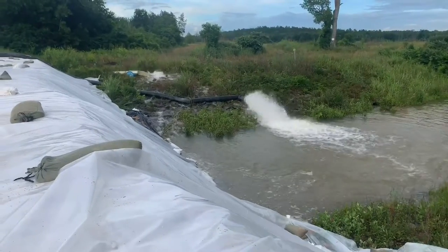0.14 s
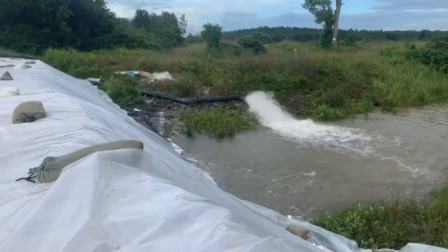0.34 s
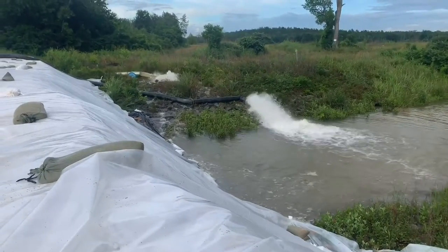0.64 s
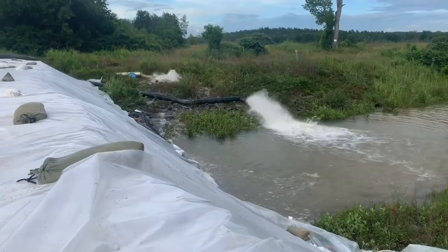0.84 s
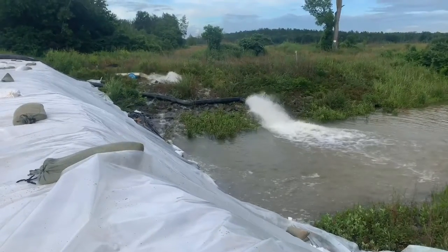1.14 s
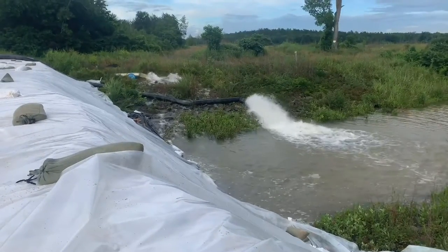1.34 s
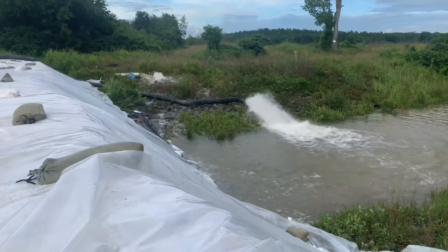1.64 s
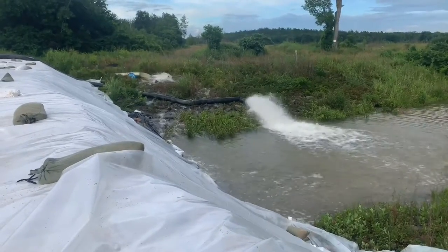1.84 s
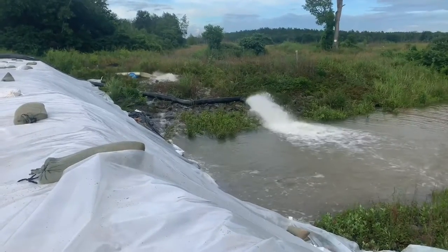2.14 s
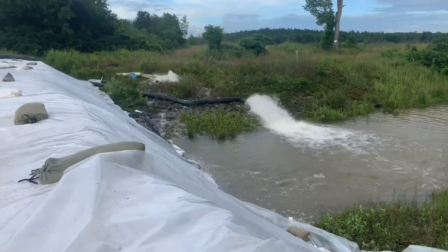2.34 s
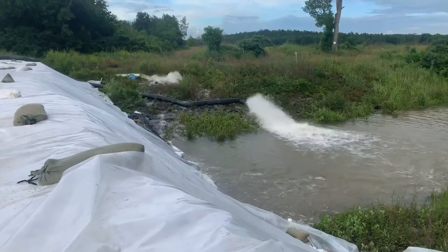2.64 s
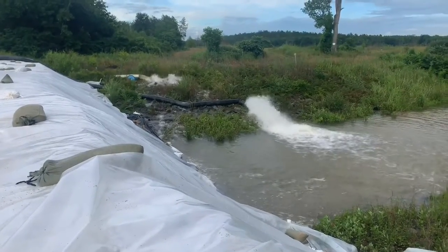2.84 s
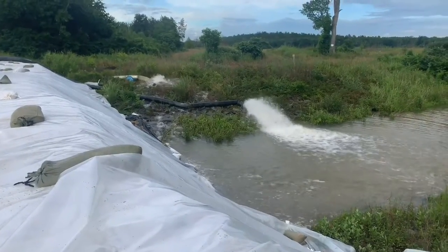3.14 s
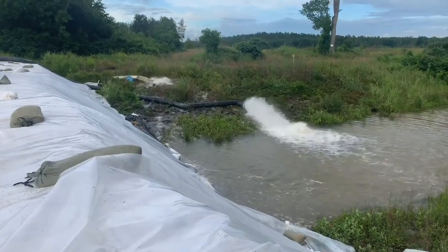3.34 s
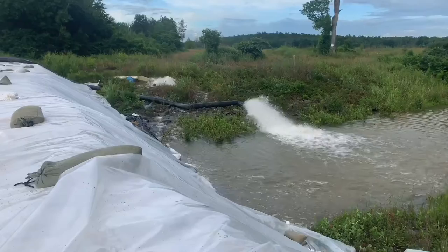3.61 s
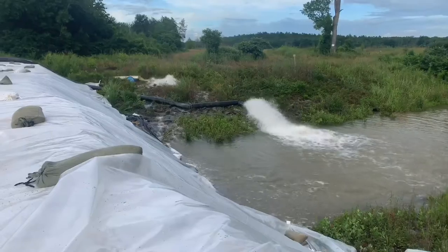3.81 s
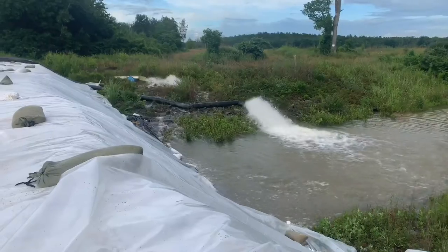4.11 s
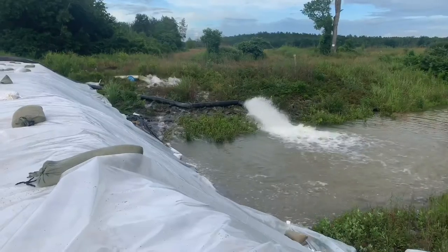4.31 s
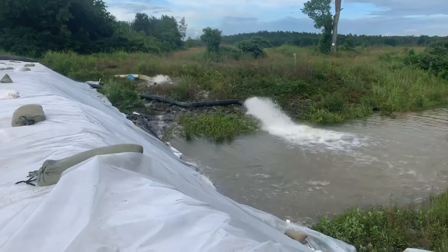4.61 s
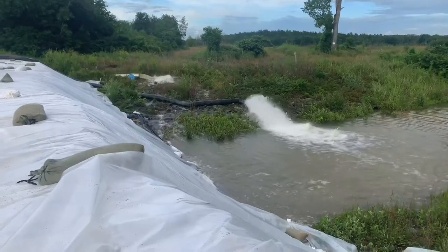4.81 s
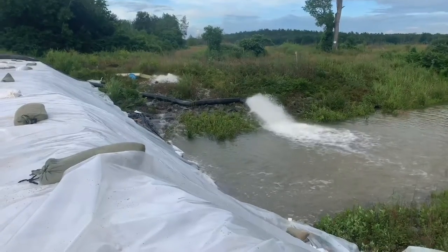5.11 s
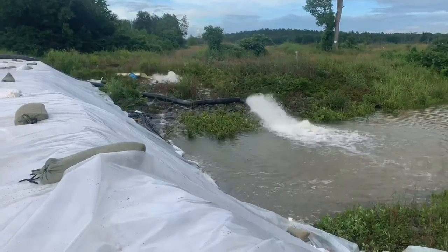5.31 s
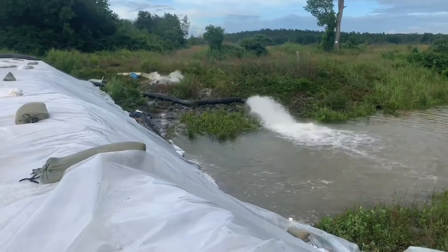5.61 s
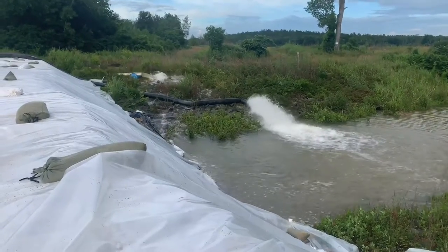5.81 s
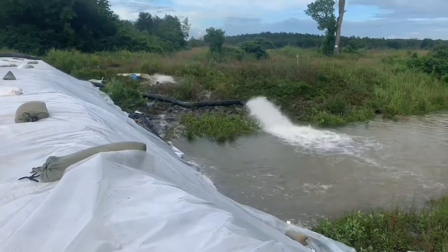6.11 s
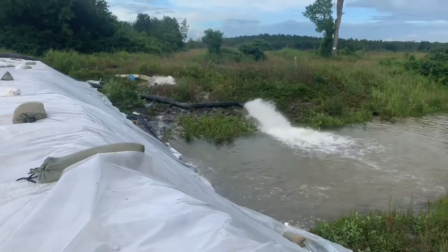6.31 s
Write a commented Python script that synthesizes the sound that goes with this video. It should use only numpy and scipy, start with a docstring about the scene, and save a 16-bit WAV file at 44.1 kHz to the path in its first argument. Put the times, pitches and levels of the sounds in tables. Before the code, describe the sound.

From 0 to about 6.5 seconds the sound is continuous, with no start or stop. Two six-cylinder diesel pumps hold a low buzzing drone near 90 hertz, at slightly different speeds, so it throbs about three times a second; one drifts slightly in speed. A rough low boom leans left, and dense metallic clatter rings through the middle range. Thin turbo whistles sit very high; the lower swells most around 2.5, 3.6 and 4.4-5.4 seconds. A water jet plunges into the creek with a broad bubbling rush and bright fizzing spray. Short slaps of spray flare irregularly, notably near 1.1, 2.4, 3.1, 4.6 and 6.1 seconds, and the flow is fuller around 4.8-5.2. A tiny high hiss flicks by at 2.4. After 5 seconds the clatter's tone shifts subtly as the phone moves. Open air, short engine reflections, wide stereo, crisp top end.

```python
"""Two diesel pumps and a jet of water

Two six-cylinder pumps run off to the left at nearly the same speed; their exhaust tones beat about three times a second.
Filtered noise makes their boom and panel clatter, and two thin turbocharger whistles lie on top.
Ahead on the right a hose throws water into a creek: random impacts make a rush with surging, fizzing spray.
It is open air, with only short reflections around the engines; a phone on the dyke hears it through two ports."""
import sys
import numpy as np
from scipy import signal
from scipy.fft import rfft, irfft
from scipy.io import wavfile
from scipy.ndimage import uniform_filter1d

SR = 44100
rng = np.random.default_rng(int(sys.argv[2]) if len(sys.argv) > 2 else 0)


def output_pcm(signal):
    """Save a mono or channel-first signal as 16-bit PCM at the path in sys.argv[1].

    Samples are clipped to [-1, 1] before scaling.
    """
    pcm = np.clip(np.atleast_2d(signal).T, -1, 1) * 32767
    wavfile.write(sys.argv[1], SR, np.round(pcm).astype(np.int16))


N = 284886
# time in seconds; frequency in Hz, kept just above zero so it can be divided by
TIME, FREQ = np.arange(N) / SR, np.fft.rfftfreq(N, 1 / SR) + 1e-6

# Exhaust tones of each pump; multiple 3 is the firing rate.
# Each row: multiple of crank speed, level in dB.
EXHAUST_A = [(2.0, -54), (2.5, -60), (3.0, -30.5), (3.5, -62), (4.0, -50.5), (4.5, -51.5), (5.5, -55),
             (6.0, -48.5), (7.0, -52.5), (7.5, -53.5), (8.0, -53), (9.0, -58), (10.0, -53.5), (11.0, -58.5),
             (16.5, -60)]
EXHAUST_B = [(1.0, -56), (2.0, -51), (3.0, -33.3), (3.5, -56), (4.0, -44), (4.5, -40), (5.0, -45.5),
             (5.5, -50), (6.0, -48.5), (6.5, -49.5), (7.0, -45), (7.5, -55.5), (8.0, -47), (8.5, -54),
             (9.0, -42), (9.5, -55.5), (10.0, -52), (10.5, -54), (11.0, -58), (16.0, -56)]
# Hums of other machinery by the pumps. Each row: pitch in Hz, level in dB.
HUMS = [(45.7, -50), (60.0, -53), (87.6, -59), (135.0, -46.5), (215.6, -50.5), (431.5, -58.5)]
# Tone colour of uneven combustion booming in silencers and housings.
# Each row: frequency in Hz, relative level in dB per Hz.
BOOM_COLOUR = [(20, -22), (45, -9.5), (72, -10.5), (105, -0.5), (135, -5.5), (170, -2), (215, -1.5),
               (255, -2.5), (285, -4), (330, -8.5), (420, -8), (480, -9.5), (540, -6), (620, -11),
               (760, -10.5), (1100, -50.5)]
# Ringing engine panels. Each row: pitch in Hz, width in Hz, relative level in dB, left minus right in dB,
# delay at the right port in ms, change in dB once the phone has moved.
PANELS = [(535, 91, -2.5, 12, 0.56, 1.5), (804, 240, -2.5, 2.5, 0.35, -0.5), (926, 120, 0, -3.5, 0.45, 0.5),
          (1200, 360, 1.5, 0, 0.48, 1.5), (1524, 153, 3, -2, 0.39, 1.5), (1692, 170, 3.5, -3, 0.41, 2.5),
          (2140, 170, 2.5, -3, 0.49, -7.5), (2374, 280, 1.5, -1.5, 0.48, -2.5),
          (2890, 300, -4, -1.5, 0.494, -1), (3570, 300, -7, -1.5, 0.48, 3),
          (4050, 170, -8.5, 3, 0.524, 2.5), (4526, 370, -4, 0, 0.49, -0.5),
          (5490, 940, -12.5, -3, 0.508, 1.5)]
# The phone shifts a little near the end. Each row: time in seconds, share of the move from 0 to 1.
PHONE_MOVE = [(0, 0.1), (4.3, 0.07), (5.3, 0.37), (6.05, 0.86), (6.46, 1)]
# Swell of the lower turbocharger whistle. Each row: time in seconds, change in dB.
TURBO_SWELL = [(0, -3), (1.4, -6), (2.3, -3.5), (2.55, 2), (2.9, 0), (3.1, -3), (3.58, 2.7), (3.8, -3),
               (4.35, 2), (4.52, -1), (4.7, 5.5), (4.95, 1.5), (5.2, 4), (5.42, 4), (5.9, -4), (6.3, 0)]
# Slow swell of the flow from the hose. Each row: time in seconds, change in dB.
FLOW = [(0, -3.5), (0.25, -1), (0.88, -2.1), (1.4, -1.9), (1.85, -3.3), (2.5, -0.2), (2.8, -2.5), (3.0, -2),
        (3.45, 0.5), (3.97, -3.9), (4.3, 0.6), (4.52, -4), (4.8, 1.2), (5.15, 2.3), (5.45, -1.4),
        (5.85, -2.6), (6.12, -1), (6.46, 1)]
# Slugs of water that slap down and throw extra spray.
# Each row: time of the peak in seconds, half length in seconds, extra level in dB over the flow.
SLUGS = [(.186, .021, 3.8), (.387, .033, 1.8), (.533, .018, 2.9), (.634, .02, 4.3), (1.102, .024, 7.2),
         (1.416, .04, 2.7), (2.083, .035, 4.1), (2.394, .039, 5), (2.65, .03, 4), (2.93, .03, 3.8),
         (3.085, .03, 5.3), (3.264, .025, 2.3), (3.393, .024, 4.4), (3.602, .013, 2), (3.736, .02, 3.6),
         (4.214, .016, 4.1), (4.623, .026, 5.3), (4.862, .015, 4), (5.23, .025, 3.3), (6.105, .04, 5.9),
         (6.345, .018, 5.6)]
# Tone colour of the jet plunging into the creek. Each row: frequency in Hz, relative level in dB per Hz.
PLUNGE_COLOUR = [(150, -5), (400, -8), (800, -1), (1300, -5), (2000, -7), (3200, -2.5), (4400, -3.5),
                 (6300, -7.5), (9000, -59), (16000, -57)]
# Tone colour of spray falling back on the water. Each row: frequency in Hz, relative level in dB per Hz.
SPRAY_COLOUR = [(2000, -16), (4500, -7), (6300, -5.8), (7300, -0.5), (8000, -1.2), (8550, 2), (9100, -1.5),
                (10100, 1), (10900, -1.5), (12300, -1.7), (14700, -3.5), (16000, -2)]
# A brief burst of narrow, high noise. One row: time of the peak in seconds, half length in seconds,
# centre in Hz, width in Hz, level in dB at the peak.
HIGH_BURST = (2.405, .013, 13250, 520, -51.5)
# The microphone ports ring in the top octave. Each row: frequency in Hz, boost in dB.
PORTS = [(12400, 0), (12750, 4), (13100, 13), (13500, 9), (13900, 9), (14300, 7), (14600, 1), (15200, 1),
         (15600, 0)]

# set speeds of the pumps, and the head start of the second crank
RPM_A, RPM_B, LEAD_B_TURNS = 1812.9, 1870.1, .071
# the governor of pump B hunts: HUNT_START_S is when it falls through the set speed;
# HUNT_RPM is the swing to either side at time zero
HUNT_PERIOD_S, HUNT_START_S, HUNT_RPM, HUNT_GROWTH_RPM_PER_S = 2.28, .15, 1.0, 1.3
# random level changes of the boom, the panels and the jet: size in dB, changes per second
BOOM_ROLL_DB, BOOM_ROLL_RATE = .55, 14
FLARE_DB, FLARE_RATE = 1.1, 14
CHURN_DB, CHURN_RATE = .8, 36
# how much later each source reaches the right port; below zero means earlier
PUMP_LAG_MS, JET_LAG_MS = .49, -.26
# turbocharger whistles: pitch in Hz, width in Hz, level in dB (before any swell)
TURBO_LOW, TURBO_HIGH = (11005, 18, -55.7), (15620, 150, -55.5)
# how much of the surge, in dB, the plunge and the lumps follow
HEAVY_SURGE_SHARE = .28
# lumps of water: how many, range of pitch, range of strength, level of them all before the surges
CLUMP_COUNT, CLUMP_LOW_HZ, CLUMP_HIGH_HZ, CLUMP_RANGE_DB, CLUMP_DB = 480, 1600, 6000, 5.5, -50.3
# one lump: time constants of its rise and decay, half width of its band
CLUMP_ATTACK_S, CLUMP_DECAY_S, CLUMP_OCTAVES = .002, .011, .11
# spray: share scattered by the ground, level before the surges
SPRAY_SCATTER_DB, SPRAY_DB = -15, -40.7
# the phone passes nothing much above this
TOP_HZ = 15750


def undb(db):
    """Turn decibels into gain."""
    return 10 ** (np.asarray(db) / 20)


def unit(x):
    """Scale a sound to an average (rms) strength of one."""
    return x / np.sqrt(np.mean(x ** 2))


def curve(rows):
    """Join rows of time and value by straight lines."""
    return np.interp(TIME, *np.transpose(rows))


def colour(points):
    """Turn rows of Hz and dB into a gain at every frequency."""
    hz, db = np.transpose(points)
    return undb(np.interp(np.log(FREQ), np.log(hz), db))


def resonance(hz, width_hz, db):
    """Gain of something that rings: a peak at one pitch with steep sides."""
    off_pitch = (FREQ ** 2 - hz ** 2) / (2 * FREQ * width_hz)
    return undb(db) / (1 + 2 * off_pitch ** 2)


def shaped(x, gain):
    """Filter a sound by a gain per frequency, then scale it to rms one."""
    return unit(irfft(rfft(x) * gain, N))


def walk(rate):
    """A smooth random drift of rms one, changing about rate times a second."""
    size = int(np.clip(SR / rate, 2, N))
    steps = np.repeat(rng.standard_normal(N // size + 2), size)
    smooth = uniform_filter1d(steps, size)
    start = rng.integers(size)
    return unit(smooth[start:][:N])


def arrive(x, lag_ms, pan_db):
    """The right port hears the sound lag_ms later than the left, and pan_db weaker."""
    right = irfft(rfft(x) * np.exp(-2j * np.pi * FREQ * lag_ms / 1000), N)
    return np.array([x * undb(pan_db / 2), right * undb(-pan_db / 2)])


def spread(three, lag_ms, pan_db, scatter_db):
    """The first row comes straight; ground and grass scatter the other two, one to each port."""
    straight = arrive(three[0], lag_ms, pan_db)
    return unit(straight + undb(scatter_db) * three[1:])


def drops(per_second, size_db):
    """Three streams of dense random impacts, a few larger than the rest."""
    hit = rng.random((3, N)) < per_second / SR
    size = undb(size_db * np.minimum(rng.exponential(size=(3, N)), 5))
    return hit * size * rng.standard_normal((3, N))


def cranks():
    """Crank angles in turns: pump A is steady, pump B swings slowly about its set speed."""
    swing_rpm = HUNT_RPM + HUNT_GROWTH_RPM_PER_S * TIME
    rpm_b = RPM_B - swing_rpm * np.sin(2 * np.pi * (TIME - HUNT_START_S) / HUNT_PERIOD_S)
    turns_a = RPM_A * TIME / 60
    turns_b = np.cumsum(rpm_b) / SR / 60 + LEAD_B_TURNS
    return turns_a, turns_b


def throb(turns):
    """Six cylinders give a narrow push three times a turn, averaging zero."""
    return sum(np.cos(6 * np.pi * k * turns) * (1 - k / 4) for k in (1, 2, 3))


def exhaust(turns, orders, waver):
    """The firing tone is firm; the tones from unequal cylinders waver."""
    out = 0
    for order, db in orders:
        angle = 2 * np.pi * order * turns
        offset = 2 * np.pi * rng.random()
        if order == 3:
            tone = np.cos(angle)
        else:
            tone = np.cos(angle + offset) * (1 + waver * walk(9))
        out = out + np.sqrt(2) * undb(db) * tone
    return out


def hums():
    """Other machinery by the pumps holds tones of fixed pitch whose strength wavers."""
    out = 0
    for hz, db in HUMS:
        tone = np.sin(2 * np.pi * (hz * TIME + rng.random()))
        out = out + np.sqrt(2) * undb(db) * tone * (1 + 0.16 * walk(3.1))
    return out


def boom():
    """Uneven combustion booms in silencers and housings: low noise that rolls in strength."""
    noise = shaped(rng.standard_normal(N), colour(BOOM_COLOUR))
    rolling = noise * undb(BOOM_ROLL_DB * walk(BOOM_ROLL_RATE))
    # it rolls over the dyke, so it comes from a little further ahead: half the delay
    return arrive(rolling, 0.5 * PUMP_LAG_MS, pan_db=4.5)


def knocking(turns):
    """Injectors and valves repeat a pattern every two turns, with loose rattle; both swell at each firing."""
    pattern = rng.standard_normal((3, 2900))
    place = (turns / 2 % 1 * pattern.shape[1]).astype(int)
    rattle = rng.standard_normal((3, N))
    return (.35 * pattern[:, place] + rattle) * (1 + .1 * throb(turns))


def clatter(turns_a, turns_b):
    """Knocking rings the panels, each placed and flaring on its own; reflections ripple the spectrum."""
    knocks = spread(knocking(turns_a) + knocking(turns_b), 0, pan_db=1.5, scatter_db=-10.0)
    sides = np.array([[.5], [-.5]])  # left, right
    powers = [resonance(hz, width, db + pan * sides) ** 2 for hz, width, db, pan, *_ in PANELS]
    delays_s = rng.uniform(.008, .04, size=5)
    echoes = 1 + 0.13 * sum(np.exp(-2j * np.pi * FREQ * delay) for delay in delays_s)
    # dividing by the root of the summed power keeps overlapping panels from piling up
    ringing = rfft(knocks) * echoes / np.sqrt(sum(powers))
    moved = curve(PHONE_MOVE)
    out = 0
    for power, (*_, lag_ms, moved_db) in zip(powers, PANELS):
        # half the delay goes to each port: left earlier, right later
        ports = np.exp(2j * np.pi * FREQ * sides * lag_ms / 1000)
        level_db = moved_db * moved + FLARE_DB * walk(FLARE_RATE)
        out = out + irfft(ringing * power * ports, N) * undb(level_db)
    return unit(out)


def pumps(turns_a, turns_b):
    """Exhaust tones and hums over a rough boom and the clatter of the engines."""
    notes = exhaust(turns_a, EXHAUST_A, waver=0.2) + exhaust(turns_b, EXHAUST_B, waver=0.2) + hums()
    engines = undb(-40.0) * boom() + undb(-38.0) * clatter(turns_a, turns_b)
    return arrive(notes, PUMP_LAG_MS, pan_db=1.0) + engines


def whistle(hz, wobble_hz):
    """A thin tone whose pitch trembles in the moving air, as heard along three paths."""
    pitch = hz + wobble_hz * np.array([walk(90) for _ in range(3)])
    tone = np.sin(2 * np.pi * np.cumsum(pitch, axis=1) / SR)
    return tone * undb(.8 * walk(12))


def turbos():
    """Turbochargers give a thin whistle that swells and fades, and a breathier one above it."""
    low_hz, low_width, low_db = TURBO_LOW
    high_hz, high_width, high_db = TURBO_HIGH
    low = spread(whistle(low_hz, low_width), 0, pan_db=-2, scatter_db=-2)
    breath = shaped(rng.standard_normal((3, N)), resonance(high_hz, high_width, 0))
    high = spread(breath, 0, pan_db=1, scatter_db=-14)
    return low * undb(low_db + curve(TURBO_SWELL)) + high * undb(high_db)


def surge():
    """How much spray the jet throws, in dB: slow flow, a short swell for each slug, and churning."""
    slugs = sum(db * np.exp(-.5 * ((TIME - at) / half) ** 2) for at, half, db in SLUGS)
    return curve(FLOW) + slugs + CHURN_DB * walk(CHURN_RATE)


def plunge():
    """Clouds of bubbles where the jet goes in; each octave of bubble sizes churns on its own."""
    bubbles = rfft(drops(per_second=6000, size_db=2.0)) * colour(PLUNGE_COLOUR)
    out = 0
    for octave in range(7, 15):  # centred on 2 to this power, in Hz; neighbours cross-fade
        share = np.maximum(1 - abs(np.log2(FREQ) - octave), 0)
        out = out + irfft(bubbles * share, N) * undb(.9 * walk(16))
    return spread(out, JET_LAG_MS, pan_db=7.0, scatter_db=6.0) * undb(-46.5)


def clumps():
    """Lumps of water break off the jet; each lands as a brief, dying burst of bubbles of its own size."""
    out, t = np.zeros((3, N)), TIME[:2048]
    envelope = (1 - np.exp(-t / CLUMP_ATTACK_S)) * np.exp(-t / CLUMP_DECAY_S)
    hz = np.fft.rfftfreq(len(t), 1 / SR) + 1  # plus one avoids the logarithm of zero
    for when, size, strength in rng.random((CLUMP_COUNT, 3)):
        centre_hz = CLUMP_LOW_HZ * (CLUMP_HIGH_HZ / CLUMP_LOW_HZ) ** size
        band = np.exp(-.5 * (np.log2(hz / centre_hz) / CLUMP_OCTAVES) ** 2)
        noise = rng.standard_normal((3, len(t)))
        burst = unit(irfft(rfft(noise) * band)) * envelope
        start = int(when * N)
        out[:, start:start + len(t)] += burst[:, :N - start] * undb(CLUMP_RANGE_DB * strength)
    return spread(out, JET_LAG_MS, pan_db=4.5, scatter_db=3) * undb(CLUMP_DB)


def spray(surge_db, pulse):
    """Fine drops fizz on the creek; the finest follow the surges most and throb with pump A."""
    impacts = shaped(drops(per_second=30000, size_db=.6), colour(SPRAY_COLOUR))
    rain = spread(impacts, JET_LAG_MS, pan_db=0, scatter_db=SPRAY_SCATTER_DB)
    # the finest drops are the part above about 12400 Hz
    fine = irfft(rfft(rain) / (1 + (12400 / FREQ) ** 24), N)
    coarse = (rain - fine) * undb(.48 * surge_db + .3 * walk(25)) * (1 + .04 * pulse)
    mist = fine * undb(surge_db + 1.05 * walk(45)) * (1 + .13 * pulse)
    return undb(SPRAY_DB) * (coarse + mist)


def high_noise_burst():
    """One brief burst of narrow noise near 13 kHz, equal in both ports."""
    at, half, hz, width_hz, db = HIGH_BURST
    band = shaped(rng.standard_normal(N), resonance(hz, width_hz, 0))
    return band * undb(db) * np.exp(-.5 * ((TIME - at) / half) ** 2)


def scene():
    """Crank angles drive the pumps; the surges drive the spray and stir the heavier water less."""
    turns_a, turns_b = cranks()
    surge_db = surge()
    machines = pumps(turns_a, turns_b) + turbos()
    heavy_water = (plunge() + clumps()) * undb(HEAVY_SURGE_SHARE * surge_db)
    return machines + heavy_water + spray(surge_db, throb(turns_a)) + high_noise_burst()


def record(dry):
    """The ports lift the top octave; a steep filter in the phone cuts off above it."""
    coloured = irfft(rfft(dry) * colour(PORTS), N)
    cutoff = signal.ellip(14, .2, 80, TOP_HZ, fs=SR, output="sos")
    return signal.sosfilt(cutoff, coloured)


dry = scene()
out = record(dry)
output_pcm(out)
```